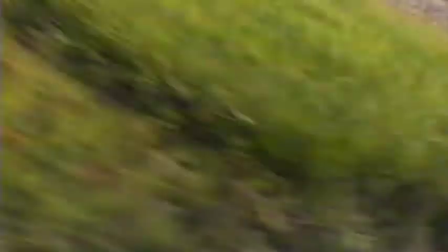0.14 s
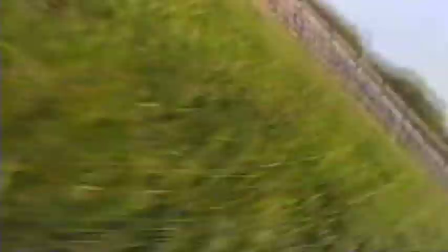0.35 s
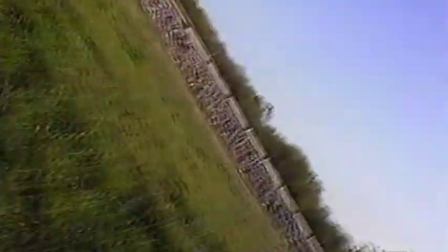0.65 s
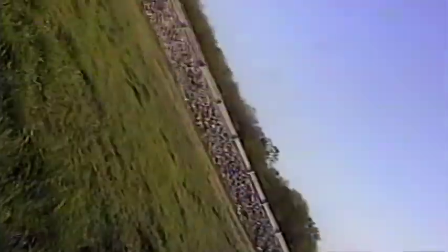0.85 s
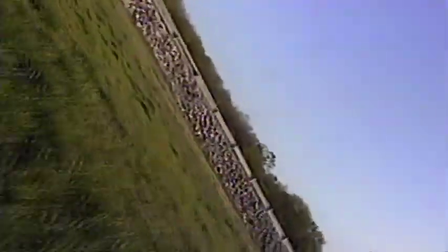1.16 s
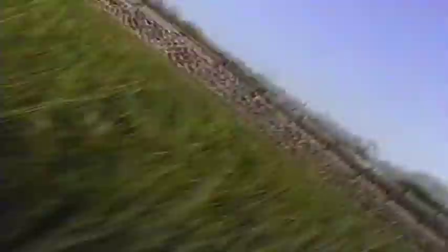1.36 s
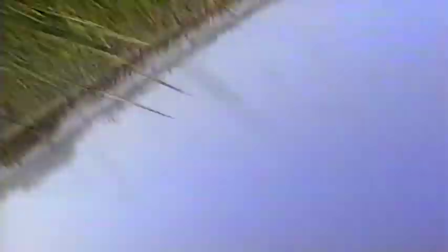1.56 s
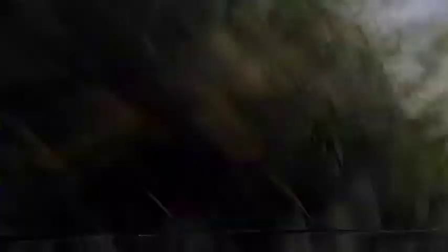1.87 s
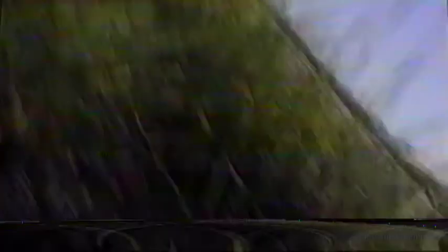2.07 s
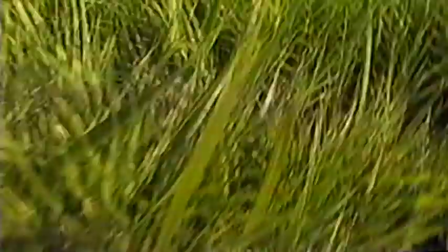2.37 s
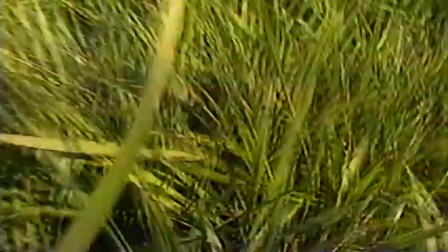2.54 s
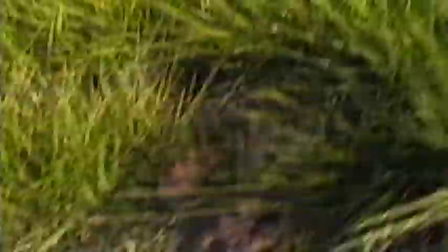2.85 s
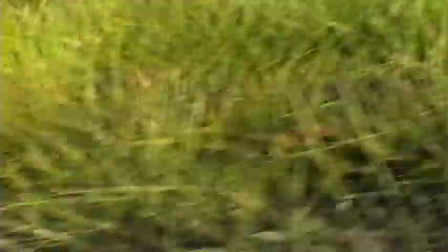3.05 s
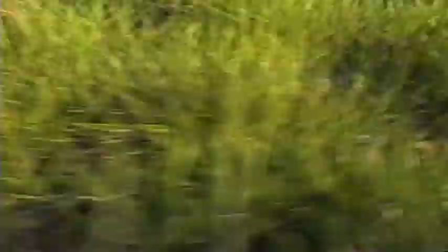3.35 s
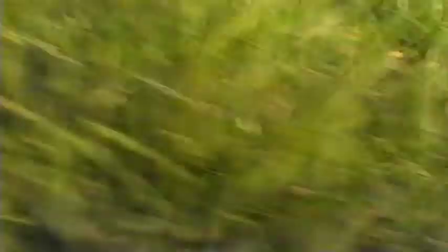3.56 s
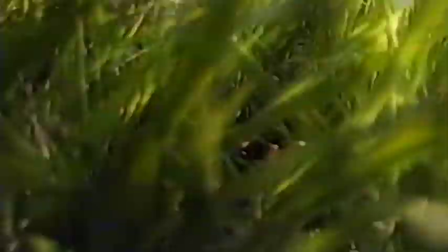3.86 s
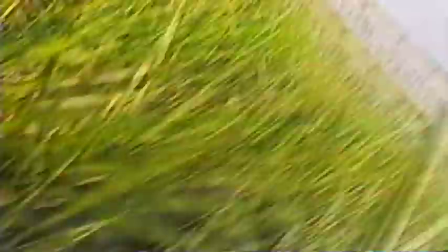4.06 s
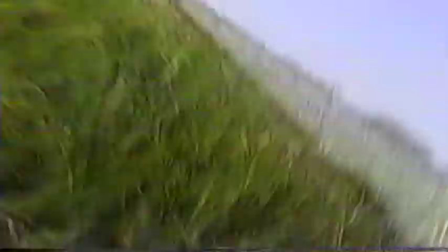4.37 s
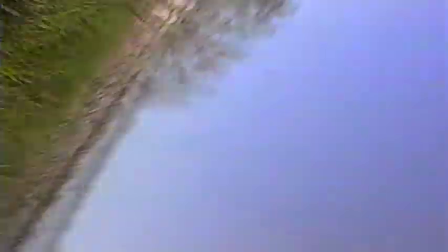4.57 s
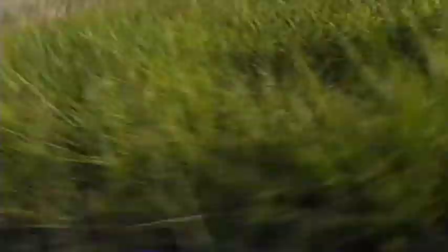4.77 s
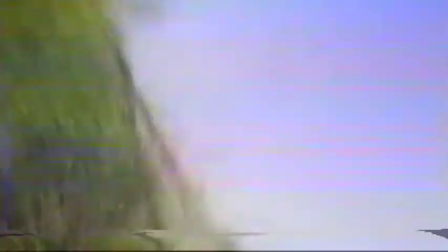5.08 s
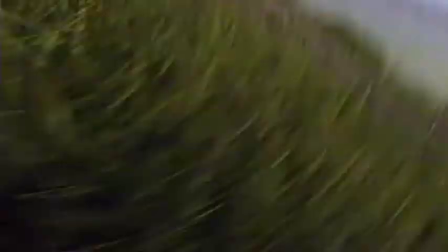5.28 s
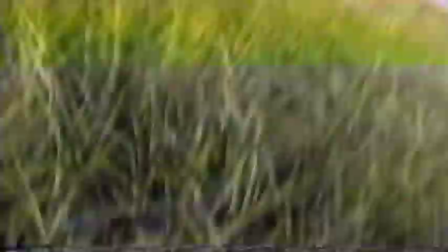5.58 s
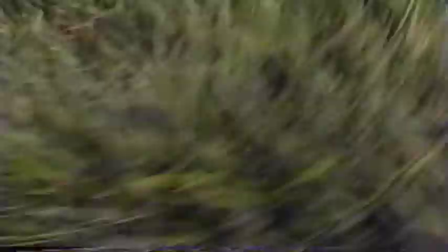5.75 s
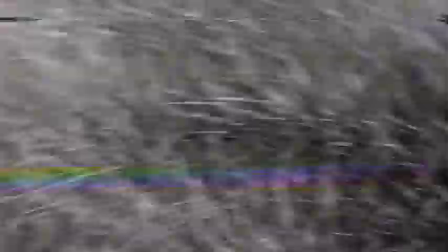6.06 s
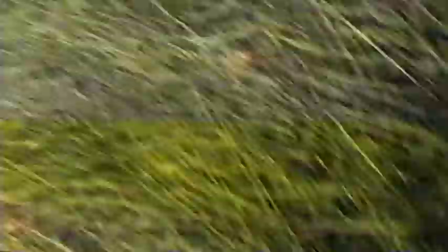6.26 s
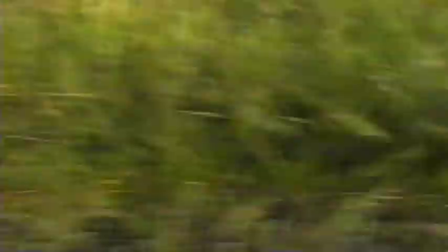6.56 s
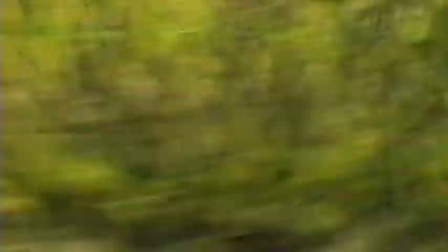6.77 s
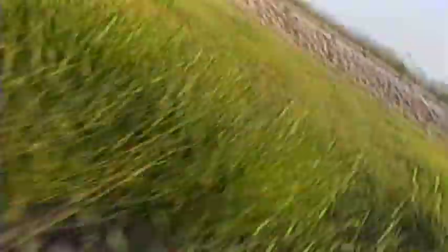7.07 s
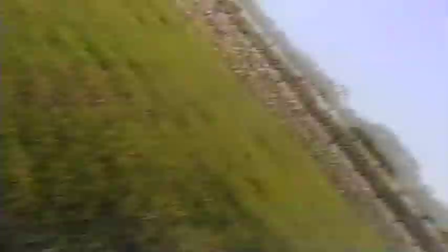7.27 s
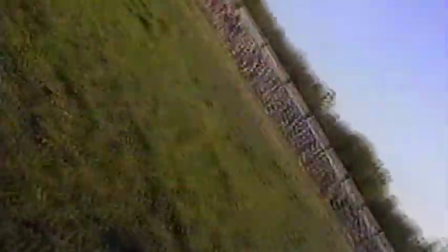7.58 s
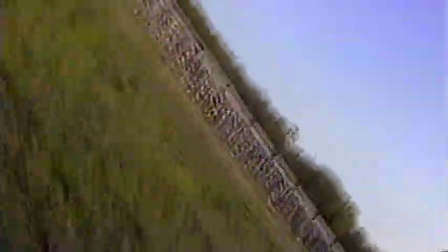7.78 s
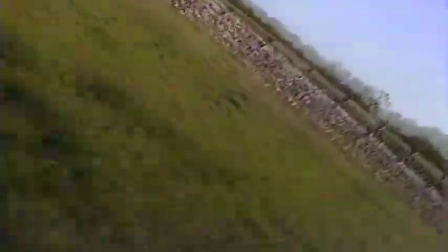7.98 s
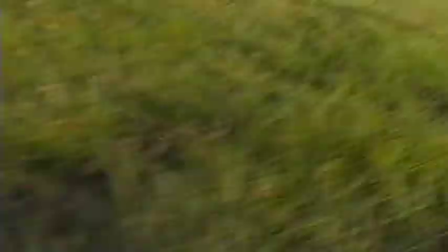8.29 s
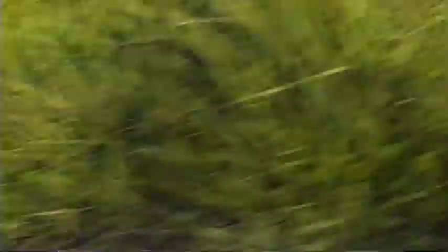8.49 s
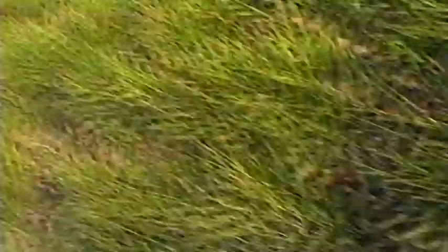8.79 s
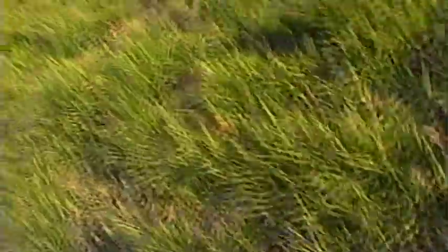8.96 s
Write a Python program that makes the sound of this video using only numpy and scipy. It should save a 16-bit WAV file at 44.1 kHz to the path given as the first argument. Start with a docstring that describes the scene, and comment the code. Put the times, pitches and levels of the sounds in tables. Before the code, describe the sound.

Wind buffets a microphone in low whooshes as grass stems tap, scratch and knock on the camera carrying it. Gritty brushing comes in uneven surges, strongest around halfway, with small snaps of blades and occasional soft thuds. Toward the end the rustle eases, leaving another gust and a last few knocks. Everything is right at the microphone and sits on the left side, with slight hiss underneath.

```python
"""Stems slap a camcorder and wind buffets its microphone as it swings on its strap through tall grass.
Blades brush and scrape the shell in surges; stems knock on the microphone cage; the body thuds.
Jolts below hearing pull the gain control down for a moment.
The microphone feeds the left track only; the right one holds a faint inverted leak and tape hiss."""
import sys
import numpy as np
from scipy import signal
from scipy.fft import rfft, irfft
from scipy.io import wavfile
from scipy.ndimage import uniform_filter1d

SR = 44100
rng = np.random.default_rng(int(sys.argv[2]) if len(sys.argv) > 2 else 0)


def log_audio(samples):
    """Write samples as a 16-bit WAV file to the path given in sys.argv[1]."""
    # one column per channel
    frames = np.atleast_2d(samples).T
    # limit to full scale, then quantise
    limited = np.clip(frames, -1, 1)
    pcm = np.round(limited * 32767).astype(np.int16)
    wavfile.write(sys.argv[1], SR, pcm)


N = 402633

# Body lands or tugs on its strap: (start [s], hold [s], level [dB])
STRAP_THUDS = [(0.11, 0.028, -31), (1.423, 0.019, -30), (1.834, 0.0098, -27), (2.057, 0.025, -36),
               (4.335, 0.097, -41), (5.01, 0.046, -30), (5.497, 0.034, -44), (5.68, .02, -31)]
# Shoves of the whole body: (time [s], relative level [dB])
BODY_JOLTS = [(0.287, -9), (0.755, 2), (0.88, -15.5), (0.975, -3.5), (1.046, -18.5), (1.661, -20),
              (2.193, -18.5), (2.539, -28), (2.736, -13), (2.837, -5), (2.942, -15), (3.222, -10.5),
              (3.482, -6), (4.083, -16), (4.575, -3), (5.064, -7.5), (5.179, -2.5), (5.355, -12),
              (5.536, -2), (5.605, -3), (5.669, -2.5), (5.774, -8.5), (6.105, -13), (6.183, -2), (6.271, 5),
              (6.801, -1.5), (6.884, -3.5), (7.667, 4.5), (8.334, -19), (8.585, -11), (8.909, -9),
              (8.981, -11)]
# Whooshes of air on a swing: (start [s], hold [s], level [dB])
SWING_GUSTS = [(0.0, 0.0048, -21), (0.102, 0.26, -29), (0.528, 0.28, -26), (1.197, 0.13, -26.5),
               (1.79, 0.038, -40), (3.02, 0.21, -39.5), (4.38, 0.32, -34.5), (4.942, 0.083, -31),
               (5.254, 0.071, -39), (5.64, 0.39, -31), (6.368, 0.45, -28.5), (7.206, 0.032, -26),
               (7.412, 0.17, -31.5), (7.894, 0.34, -22.5), (8.673, 0.18, -34)]
# Surges through the grass: (start [s], hold [s], level [dB], treble re level [dB])
GRASS_SURGES = [(0.578, 0.015, -35.5, -23), (1.416, 0.099, -47.5, -9), (1.786, 0.11, -37.5, -21),
                (1.923, 0.29, -37.5, -15.5), (2.29, 0.15, -32.5, -18.5), (3.545, 0.19, -22, -21.5),
                (3.717, 0.35, -31, -15), (4.24, 0.064, -25, -15), (4.605, 0.092, -28, -22),
                (4.8, 0.19, -25, -22), (5.363, 0.14, -36.5, -19.5), (5.656, 0.34, -41.5, -19.5),
                (6.828, 0.084, -29, -23)]
# Knocks on the microphone cage: (time [s], level [dB], pitch [Hz], length [ms])
CAGE_KNOCKS = [(0.051, -8.5, 228, 7), (0.162, -17.5, 273, 23.7), (0.26, -6.5, 318, 14),
               (0.302, -8.5, 278, 15.7), (0.527, -14, 244, 10.7), (0.816, -3, 228, 10.5),
               (1.412, -13.5, 494, 13.8), (1.427, -10.5, 237, 16), (1.561, -13.5, 213, 7.8),
               (1.835, -9, 239, 9.2), (2.609, -20, 385, 7.2), (3.616, -20.5, 391, 5.9),
               (3.748, -14.5, 286, 7.1), (4.425, -23.5, 240, 24), (4.51, -24, 192, 7.9),
               (4.562, -20.5, 338, 12), (4.699, -16.5, 293, 16.8), (4.923, -23, 277, 17),
               (5, -19.5, 370, 13), (5.037, -18.5, 189, 13.4), (5.197, -6.5, 195, 5.2),
               (5.272, -13.5, 400, 3.9), (5.444, -23, 287, 39.6), (5.485, -23, 307, 6.5),
               (5.537, -8.5, 218, 9.9), (5.683, -7.5, 306, 4.5), (5.769, -17.5, 305, 10.2),
               (5.834, -6.5, 320, 5.5), (5.863, -16, 362, 4), (5.905, -12, 359, 6.2),
               (5.924, -22.5, 331, 8.8), (5.965, -19.5, 177, 21.7), (6.059, -19.5, 276, 15.5),
               (6.085, -12, 462, 5.9), (6.167, -3, 240, 8.8), (6.273, -15.5, 313, 5.8),
               (6.805, -15, 418, 13.8), (6.871, -12, 327, 8.9), (6.995, -15, 360, 6),
               (7.068, -20, 232, 5.9), (7.167, -16.5, 253, 6.9), (7.344, -16, 335, 6.7),
               (8.255, -15, 241, 4.9), (8.332, -6, 251, 6.9), (8.401, -5.5, 352, 8.7),
               (8.591, -23.5, 266, 11.2), (8.657, -16.5, 236, 10.2), (8.704, -10.5, 314, 13.4),
               (8.796, -17, 264, 5.1)]
# Stems on the shell: (time [s], scratch [dB], treble [dB], length [ms], stem ring [Hz])
STEM_SLAPS = [(0.0, -22, -36.5, 3.6, 2810), (0.107, -32, -47, 7.7, 970), (0.158, -22.5, -43, 4.2, 1030),
              (0.174, -27.5, -41, 13, 3060), (0.196, -21, -42, 3.9, 1680), (0.213, -22, -44, 1.7, 1570),
              (0.242, -25, -45, 7.2, 1380), (0.264, -30, -49, 6.1, 4830), (0.308, -22.5, -41, 2.7, 2800),
              (0.424, -38, -67, 3.4, 1300), (0.442, -38, -62, 2.5, 1300), (0.456, -29, -53, 2.4, 1380),
              (0.488, -29.5, -49, 3, 2900), (0.505, -33.5, -51, 6.6, 4520), (0.555, -35, -47, 38, 3370),
              (0.621, -30.5, -43.5, 14, 2920), (0.653, -32, -45, 1.1, 2980), (0.685, -30.5, -48, 15, 4500),
              (0.74, -26.5, -40, 7.9, 2920), (0.753, -19, -33.5, 3.5, 1170), (0.81, -11, -29, 7.5, 2970),
              (0.817, -4.5, -18, 2.2, 5140), (0.847, -33.5, -52, 18, 3080), (0.861, -23.5, -37, 2.6, 5000),
              (0.9, -28, -44, 9.4, 2970), (0.967, -18.5, -33, 10, 1310), (1.058, -23.5, -40.5, 2.5, 1020),
              (1.252, -38, -53, 3, 3280), (1.274, -28, -44, 4.8, 3400), (1.285, -34, -54, 8.7, 3460),
              (1.3, -32.5, -49, 15, 3500), (1.322, -34, -49, 46, 3600), (1.381, -26, -43, 6.4, 3470),
              (1.401, -7, -31, 6.9, 1290), (1.412, -18, -42.5, 41.6, 1150), (1.442, -22, -44, 5.3, 1610),
              (1.649, -34, -62, 3.1, 1490), (1.672, -34.5, -66, 7.2, 1460), (1.755, -32.5, -53, 14.5, 2450),
              (1.783, -25.5, -45.5, 9.6, 850), (1.821, -24, -50, 44, 685), (1.83, -24.5, -44.5, 59, 1960),
              (1.904, -34, -48, 19, 3000), (1.966, -26.5, -48, 4.8, 1863), (1.973, -24, -51, 2.7, 2320),
              (2.038, -33.5, -51, 39, 2400), (2.06, -27, -48, 3.9, 2400), (2.079, -32, -57, 1.4, 1200),
              (2.125, -33.5, -47, 69, 2470), (2.165, -29, -59, 1.9, 1100), (2.212, -26, -48, 2.2, 1000),
              (2.257, -25.5, -37, 3.1, 4020), (2.315, -32, -52, 2, 900), (2.326, -27.5, -41, 5.2, 4100),
              (2.358, -20.5, -43, 2, 1110), (2.379, -27, -47, 12, 1030), (2.403, -23.5, -42, 6.5, 1000),
              (2.433, -30, -46, 2.9, 1500), (2.48, -31.5, -50, 13.5, 3040), (2.544, -35, -52, 20.5, 3100),
              (2.603, -36, -60, 26, 2250), (2.708, -36, -56, 3, 784), (2.737, -31.5, -81, 6.9, 3940),
              (2.806, -25, -50, 5.1, 745), (2.838, -28, -41.5, 1.7, 3300), (2.91, -25.5, -41, 4.6, 2960),
              (2.954, -27, -80, 5.1, 3180), (3.008, -27, -74, 4.1, 3020), (3.017, -25.5, -45, 3.9, 2850),
              (3.029, -37, -54, 4.1, 3170), (3.172, -28.5, -46, 2, 2830), (3.181, -38, -60, 6.6, 3270),
              (3.223, -35.5, -55, 4.2, 2970), (3.346, -23.5, -47, 1.9, 3020), (3.381, -25.5, -66, 4.3, 990),
              (3.407, -16, -46, 3.5, 990), (3.451, -24, -66, 23, 850), (3.478, -18.5, -36.5, 17, 960),
              (3.516, -23, -32, 3.3, 1500), (3.536, -6, -52, 2.6, 920), (3.554, -12.5, -48, 7.9, 2940),
              (3.588, -17.5, -31.5, 39, 1110), (3.667, -24, -31.5, 7.5, 1080),
              (3.723, -18.5, -36, 63, 1080), (3.825, -33, -51, 110, 1220), (3.865, -25, -55, 12, 1120),
              (3.992, -27, -47, 19, 1710), (4.099, -23, -49, 6.8, 1000), (4.133, -21, -55, 3, 1800),
              (4.196, -22, -60, 26, 2190), (4.245, -18, -35, 16, 2780), (4.267, -22.5, -43, 69, 2390),
              (4.318, -22.5, -40, 41, 2310), (4.354, -23, -38.5, 32, 1920), (4.384, -23.5, -41, 21.5, 2280),
              (4.438, -27.5, -39, 3.2, 4400), (4.51, -26.5, -54, 5.7, 2500), (4.535, -27, -58, 6, 3170),
              (4.556, -25.5, -46, 6, 3880), (4.589, -29, -36, 4.8, 3060), (4.596, -12.5, -15.5, 1.3, 6000),
              (4.622, -6, -28, 6.2, 2680), (4.631, -3.5, -45, 1.8, 940), (4.643, -23, -42, 1.5, 6000),
              (4.682, -21.5, -44, 15, 2360), (4.731, -21.5, -48, 4.3, 3040), (4.743, -25, -56, 4.2, 960),
              (4.773, -21, -45, 3.4, 2300), (4.794, -19, -38, 4, 1450), (4.822, -26, -47, 5.3, 2500),
              (4.828, -20, -52, 2.5, 1000), (4.853, -20.5, -30.5, 17, 2670), (4.9, -19, -42, 53, 2300),
              (4.988, -20, -38.5, 40, 2100), (5.071, -23, -33, 1.5, 2900), (5.166, -19, -47, 1.6, 1170),
              (5.196, -18.5, -45, 4.1, 1440), (5.238, -11, -36, 2.1, 2530), (5.272, -28, -55, 2, 2380),
              (5.284, -23.5, -55, 11.6, 700), (5.291, -28.5, -50, 41, 2650), (5.331, -20, -52, 2.5, 2300),
              (5.345, -29, -53, 5, 2400), (5.366, -30.5, -41, 6, 3000), (5.481, -33.5, -49, 34, 2820),
              (5.535, -20.5, -40, 4.6, 2400), (5.603, -9.5, -69, 2.5, 2050), (5.634, -17, -67, 4, 2290),
              (5.68, -23.5, -44, 9, 2400), (5.691, -24, -55, 3.3, 2580), (5.728, -16.5, -33, 4.6, 1650),
              (5.744, -23, -58, 4.2, 2520), (5.769, -36.5, -57, 31, 1240), (5.789, -24, -57, 2.2, 2840),
              (5.832, -20, -48, 4.8, 2540), (5.862, -24.5, -60, 2.6, 2840), (5.905, -24.5, -48, 2.2, 2930),
              (5.974, -37, -51, 27, 3240), (6.008, -39, -55, 26, 3360), (6.06, -29.5, -59, 8.3, 1180),
              (6.084, -20, -47, 5.4, 1390), (6.122, -11.5, -30, 0.56, 1680), (6.157, -13.5, -34, 1.6, 1990),
              (6.165, -10.5, -42, 4.3, 1020), (6.272, -21.5, -41, 4.1, 5360), (6.459, -27, -63, 6.4, 1010),
              (6.638, -27.5, -57, 3.8, 2120), (6.656, -28, -66, 4, 2760), (6.677, -26, -57, 3.1, 2750),
              (6.708, -29, -60, 4, 900), (6.725, -19.5, -38.5, 7.7, 2200), (6.768, -26, -52, 3.2, 1500),
              (6.785, -27, -52, 20, 3300), (6.804, -18.5, -48, 12, 1010), (6.82, -3, -31, 2.5, 1050),
              (6.85, -16, -43, 19, 2180), (6.868, -10, -37, 11.7, 990), (6.882, -18, -38, 9.8, 890),
              (6.94, -19, -39, 10.5, 1320), (6.957, -6, -44, 1.7, 1100), (6.99, -22, -60, 2, 990),
              (6.994, -20.5, -47, 6.1, 2680), (7.096, -36, -49, 2.6, 3000), (7.279, -37, -49, 5, 4100),
              (7.364, -32, -51.5, 12, 2950), (7.398, -37, -56, 13, 2980), (7.435, -37.5, -60, 9.2, 4150),
              (7.465, -34, -52, 5.3, 3220), (7.492, -25.5, -45, 2.3, 2770), (7.605, -17.5, -45, 1.2, 1510),
              (7.662, -19.5, -32, 3.3, 1500), (7.664, -42, -45, 2.2, 12400), (8.253, -40.5, -56, 26, 3000),
              (8.286, -33, -57, 2.6, 3000), (8.292, -30, -61, 4.2, 3040), (8.302, -23, -34, 3.7, 2750),
              (8.333, -28.5, -38.5, 3.2, 900), (8.39, -36.5, -55, 19, 1180), (8.451, -29.5, -42, 1.5, 5160),
              (8.498, -37.5, -54.5, 45, 3250), (8.556, -28, -39, 7.5, 4450), (8.594, -38, -57, 11, 2900),
              (8.706, -35, -48, 20, 3000), (8.751, -36, -54, 15, 1090), (8.795, -31, -49, 10.3, 3700),
              (8.808, -36.5, -45, 8.6, 5200), (8.854, -35, -53, 8.8, 815), (8.891, -34.5, -52, 17, 2880),
              (8.905, -23.5, -31, 1.2, 5170), (8.969, -35, -57, 24, 3020), (8.978, -14.5, -26.5, 2.3, 2130),
              (9.049, -42, -60, 5, 2970), (9.063, -26.5, -52, 0.92, 1590), (9.086, -37, -59, 7.1, 3050),
              (9.101, -21, -32, 2.6, 5200), (9.125, -33, -42, 1.8, 5870)]
# Wind on the microphone port: (frequency [Hz], relative density [dB])
WIND_SPECTRUM = [(15, -41), (25, -48.5), (79, -11.5), (133, -3), (219, -3.5), (511, -13.5), (1170, -30),
                 (2150, -33.5), (2900, -37.5), (3800, -47), (5200, -77), (7500, -85), (15400, -110)]
# Rubbed shell: (frequency [Hz], relative density [dB])
SHELL_SPECTRUM = [(60, -28), (140, -13), (280, -5), (900, -2), (1600, -7), (3200, -11), (4500, -18),
                  (5700, -22), (6500, -36), (15000, -75)]
# Treble of grass on the shell: (frequency [Hz], relative density [dB])
TREBLE_SPECTRUM = [(3000, -28), (5500, -6), (7500, -4), (9800, -7), (12300, -1.5), (13800, -8),
                   (15600, -14), (16400, -27)]


def undb(db):
    """dB to gain."""
    return 10 ** (np.asarray(db) / 20)


def unit(x):
    """Scale to rms 1."""
    return x / np.sqrt(np.mean(x ** 2))


def butter(x, order, hz, kind="low"):
    """Causal Butterworth filter."""
    return signal.sosfilt(signal.butter(order, hz, kind, fs=SR, output="sos"), x)


def colour(x, spectrum, size=2048):
    """Minimum-phase filter with the given spectrum; power gain 1."""
    hz, db = np.transpose(spectrum)
    log_hz = np.log(np.arange(size // 2 + 1) * SR / size + 1)
    cepstrum = irfft(np.interp(log_hz, np.log(hz), db) * np.log(10) / 20)
    cepstrum[1:size // 2] *= 2
    cepstrum[size // 2 + 1:] = 0
    impulse = irfft(np.exp(rfft(cepstrum)))
    return signal.fftconvolve(x, impulse / np.sqrt(np.sum(impulse ** 2)))[:N]


def walk(rate_hz):
    """Random steps, smoothed twice; rms 1."""
    hold = int(SR / rate_hz)
    steps = np.repeat(rng.standard_normal(N // hold + 1), hold)
    return unit(uniform_filter1d(uniform_filter1d(steps, hold), hold)[:N])


def tone(hz):
    """Sine following a pitch curve; rms 1."""
    return np.sqrt(2) * np.sin(2 * np.pi * np.cumsum(hz) / SR)


def add(track, start_s, sound):
    """Mix a sound in at start_s."""
    i = int(start_s * SR)
    track[i:i + len(sound)] += sound[:N - i]


def swells(start_s, hold_s, db, rest_db, rise_db_s, fall_db_s):
    """Level [dB] of events that rise, hold and fall over a floor; powers add."""
    t = np.arange(0, N + 64, 64)[:, None] / SR
    before_s, after_s = np.maximum(start_s - t, 0), np.maximum(t - start_s - hold_s, 0)
    event_db = db - rise_db_s * before_s - fall_db_s * after_s
    power = undb(rest_db) ** 2 + np.sum(undb(event_db) ** 2, axis=1)
    return np.interp(np.arange(N) / SR, t[:, 0], 10 * np.log10(power))


def jolts():
    """Shoves of the body: single slow pushes below hearing."""
    out, t = np.zeros(N), np.arange(6144) / SR
    push = (t / 0.0072) ** 4 * np.exp(4 - t / 0.005) / 4 ** 4
    for time_s, db in BODY_JOLTS:
        add(out, time_s, undb(db) * push)
    return out


def rumble():
    """Deep handling noise; thuds as the body lands or tugs on its strap."""
    db = swells(*np.transpose(STRAP_THUDS), rest_db=-55, rise_db_s=699, fall_db_s=351)
    noise = undb(3 * walk(11)) * rng.standard_normal(N)
    return undb(db) * unit(butter(noise, 2, hz=60))


def wind(whistle_hz=2120, whistle_db=-35):
    """Eddies on the microphone port: dull fluttering noise, plus a thin edge whistle."""
    db = swells(*np.transpose(SWING_GUSTS), rest_db=-51.5, rise_db_s=62, fall_db_s=104)
    eddies = unit(undb(2 * walk(40)) * rng.standard_normal(N))
    whistle = tone(whistle_hz + 2 * walk(20))
    return undb(db) * (colour(eddies, WIND_SPECTRUM) + undb(whistle_db) * whistle)


def grit(swish_share=0.15):
    """Stick and slip: dense ticks, a few much stronger, bunched over an even swish."""
    ticks = (rng.random(N) < 0.25) * rng.standard_normal(N)
    ticks *= undb(2.6 * rng.exponential(size=N))
    bunched = unit(ticks * undb(2.5 * walk(300)))
    return np.sqrt(1 - swish_share) * bunched + np.sqrt(swish_share) * rng.standard_normal(N)


def shell(x, drift_db=2):
    """Shell response; contact points shift, so each band swells and fades by itself."""
    x = colour(x, SHELL_SPECTRUM)
    lows = [0] + [butter(x, 2, hz) for hz in (600, 1400, 2600, 4500)] + [x]
    return sum((hi - lo) * unit(undb(drift_db * walk(45))) for lo, hi in zip(lows, lows[1:]))


def snaps(count=1000, decay_cycles=1.8):
    """Single blades spring free: short rings, each at its own pitch."""
    out, t = np.zeros(N), np.arange(256) / SR
    for when, pitch, size in rng.random((count, 3)):
        hz = 700 * 4.5 ** (pitch ** 2)
        ring = np.exp(-t * hz / decay_cycles) * np.sin(2 * np.pi * hz * t)
        add(out, when * N / SR, (1.02 - size) ** -0.4 * ring)
    return unit(out)


def brushing(snap_db=-0.5, snap_knee_db=-42):
    """Many blades slide over the shell in surges; snaps fade under a light touch."""
    start_s, hold_s, db, tilt_db = np.transpose(GRASS_SURGES)
    slopes = dict(rise_db_s=114.5, fall_db_s=150)
    rub_db = swells(start_s, hold_s, db, rest_db=-49.5, **slopes)
    treble_db = swells(start_s, hold_s, db + tilt_db, rest_db=-70.5, **slopes)
    rub = unit(grit() * undb(2.4 * walk(55)))
    snapping = undb(snap_db + np.minimum(rub_db - snap_knee_db, 0)) * snaps()
    return undb(rub_db) * (shell(rub) + snapping) + undb(treble_db) * colour(rub, TREBLE_SPECTRUM)


def knocks(hard_db=-7.5, soft_range_db=14.5, lead_share=0.433):
    """A stem presses the microphone cage: a few uneven cycles, falling in pitch."""
    out = np.zeros(N)
    waver, tremble, rasp = (np.append(walk(hz), np.zeros(SR)) for hz in (250, 400, 2500))
    for time_s, db, hz, ms in CAGE_KNOCKS:
        length_s = ms / 1000
        u = np.arange(int(3 * SR * length_s)) / SR / length_s - lead_share  # 0 to 1 over the main swell
        span = slice(int(time_s * SR), int(time_s * SR) + len(u))
        soft = np.clip((hard_db - db) / soft_range_db, 0, 1)  # softer: less sag, rougher
        sag = 0.598 * (1 - 0.68 * soft) * (np.maximum(u, 0) - 0.5)
        scatter = 0.063 * (1 + 3.05 * soft) * waver[span]
        phase = 2 * np.pi * np.cumsum(hz * np.exp(scatter - sag)) / SR
        wobble = np.sin(phase) + 0.19 * np.cos(2 * phase)
        wobble *= undb((0.5 + 3.85 * soft) * tremble[span])
        noise = 0.16 * (1 + 0.44 * soft) * rasp[span]
        swell = np.exp(-np.abs((u - 0.5) / 0.65) ** 2.7)
        tail = 0.27 * (u > 0.5) * (1 - np.exp(-(u - 0.5) ** 4)) * np.exp(-u / 0.55)
        add(out, time_s - lead_share * length_s, undb(db) * (swell + tail) * (wobble + noise))
    return out


def stroke(texture, time_s, envelope):
    """One contact: enveloped texture, scaled to the envelope's energy."""
    burst = texture[int(time_s * SR):][:len(envelope)] * envelope
    return burst * np.sqrt(np.sum(envelope ** 2) / np.sum(burst ** 2))


def slaps(tap_ms=3, thick_hz=2300, thin_hz=3100, ring_ratio=1.3):
    """Each stem lands, scratches the shell, rings and lets go; the shell booms after a tap."""
    scratch, dull, ring, treble, clicks = np.zeros((5, N))
    t = np.arange(6144) / SR
    rub, crackle = (np.append(grit(), np.ones(len(t))) for _ in range(2))
    crackle[:N] = unit(crackle[:N] * undb(3.5 * walk(200)))
    for time_s, db, treble_db, ms, hz in STEM_SLAPS:
        u = t * 1000 / ms
        tap = np.exp(-ms / tap_ms)  # 1: dies at once; 0: sets in gently and holds
        attack = 1 - np.exp(-u / 0.049)
        envelope = attack * ((1 - tap) * np.exp(-u ** 4) + (0.31 + 1.36 * tap) * np.exp(-u))
        burst, pluck = stroke(rub, time_s, envelope), stroke(crackle, time_s, envelope)
        click = tap * np.sqrt(np.sum(envelope ** 2))
        pluck[0] += undb(-1.5) * click
        clicks[int(time_s * SR)] += undb(db) * click
        # Thin stems ring more and stir the shell's low end; thick ones scratch duller.
        thin = np.clip(np.log(hz / thick_hz) / np.log(thin_hz / thick_hz), 0, 1)
        scrape = butter(burst, 1, min(6.2 * hz, 16250))
        stem = np.sqrt(SR / hz) * butter(pluck, 3, [hz / ring_ratio, hz * ring_ratio], "band")
        add(scratch, time_s, undb(db) * (1 - 0.1 * thin) * (1 - 0.8 * tap) * scrape)
        add(dull, time_s, undb(db) * 0.66 * thin * burst)
        add(ring, time_s, undb(db + 2.5 * thin) * stem)
        add(treble, time_s, undb(treble_db) * burst)
    contact = scratch + butter(dull, 2, hz=1100) + undb(-1) * clicks
    boom = signal.lfilter(*signal.iirpeak(410, Q=1.8, fs=SR), clicks)
    return shell(contact) + undb(12.5) * boom + 0.39 * ring + colour(treble, TREBLE_SPECTRUM)


def scene():
    """One microphone on the left input; the right is not wired."""
    mic = wind() + brushing() + slaps() + knocks() + jolts()
    return np.array([mic, np.zeros(N)])


def gain_control(mic, smooth_s=0.016, half_gain_level=0.016):
    """Gain dips on jolts: the detector sits ahead of the low cut."""
    deep = np.abs(butter(mic, 2, hz=25))
    pole = np.exp(-1 / (smooth_s * SR))
    level = signal.lfilter([1 - pole], [1, -pole], deep)
    return 2 / (1 + level / half_gain_level)


def leak(left, leak_db=-31.5, corner_hz=3350):
    """Inverted crosstalk, brightened by stray capacitance; fuzz follows the treble."""
    slope = np.gradient(left) * SR / (2 * np.pi * corner_hz)
    treble = butter(left, 1, 3000, "high")
    treble_rms = np.sqrt(uniform_filter1d(treble ** 2, size=64) + 1e-14)
    fuzz = treble_rms * np.diff(rng.standard_normal(N + 1))
    return -undb(leak_db) * (left + slope) + undb(-36) * fuzz


def record(dry):
    """Low cut, gain control, lopsided clipping, leak, line-scan whine, tape hiss, top cut."""
    scan_hz, scan_db, hiss_db, top_hz = 15734, -80.5, -76.5, 16250
    mic = dry[0]
    left = butter(mic, 6, 45, "high") + rumble()  # rumble slips past the low cut
    left *= gain_control(mic)
    limit = np.where(left > 0, 1.0, 0.6)
    left /= (1 + np.abs(left / limit) ** 4) ** 0.25
    right = leak(left)
    whine = undb(scan_db) * tone(scan_hz + 50 * walk(150))
    hiss = undb(hiss_db) * rng.standard_normal((2, N))
    top_cut = signal.ellip(10, 0.2, 70, top_hz, fs=SR, output="sos")
    return signal.sosfilt(top_cut, np.array([left, right]) + hiss + whine)


dry = scene()
out = record(dry)
log_audio(out)
```